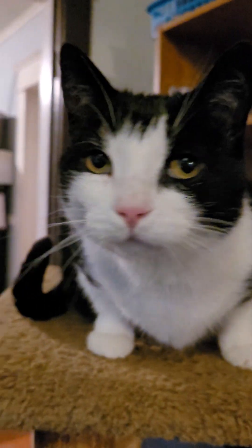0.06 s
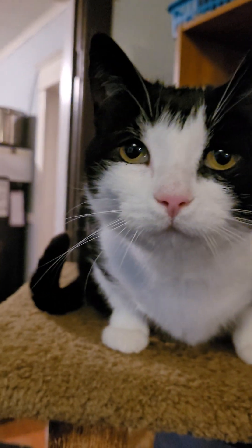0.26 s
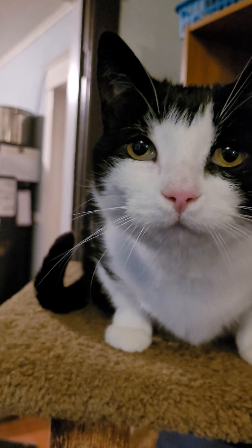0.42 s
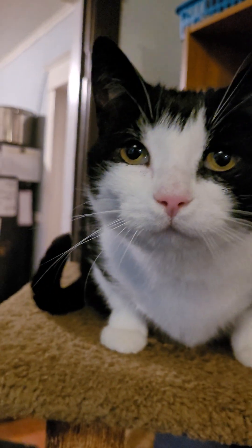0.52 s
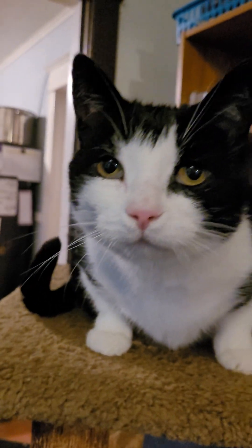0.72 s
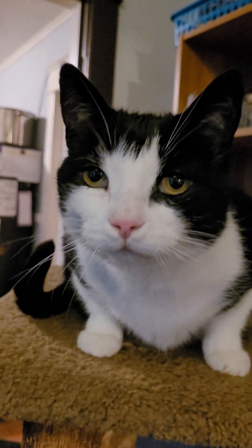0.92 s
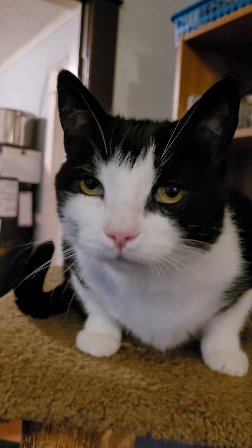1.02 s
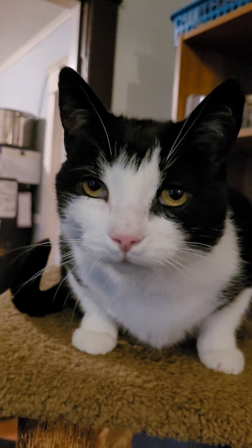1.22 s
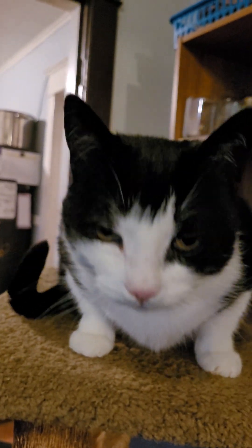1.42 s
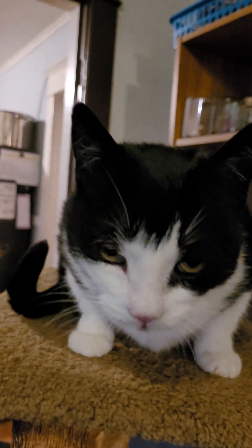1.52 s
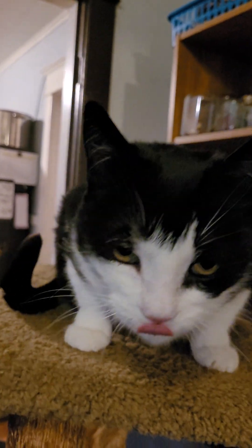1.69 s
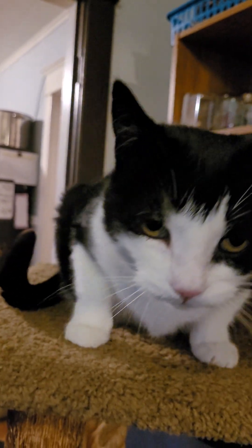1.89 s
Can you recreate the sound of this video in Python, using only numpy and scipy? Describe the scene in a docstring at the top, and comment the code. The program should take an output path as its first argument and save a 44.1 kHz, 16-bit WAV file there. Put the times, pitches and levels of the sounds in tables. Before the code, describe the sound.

A cat purrs loudly up close in one rattling bout, then smacks and licks its mouth.

```python
"""A cat purrs close by in a small, quiet room; noise and a faint mains hum lie below throughout.
First a faint, rough flutter dies away. Then the loud bout swells, holds and stops: about 30 times a second
the larynx twitches, the vocal folds flap a few times, air hisses through the nose, and a soft thump sounds
with each opening. After it the mouth opens with smacks (noise bursts rung by the mouth), the tongue licks
with wet ticks, and the faint flutter, noise with a pulsing level, returns."""
import sys
import numpy as np
from scipy import signal
from scipy.fft import rfft, irfft
from scipy.io import wavfile

SR = 44100
rng = np.random.default_rng(int(sys.argv[2]) if len(sys.argv) > 2 else 0)


def dump(signal):
    """Clip the signal to [-1, 1] and save it as 16-bit WAV at the path in sys.argv[1]."""
    limited = np.clip(np.atleast_2d(signal).T, -1, 1)
    pcm = np.round(limited * 32767).astype(np.int16)
    wavfile.write(sys.argv[1], SR, pcm)


N = 85995


def amp(db):
    """Decibels to gain."""
    return 10 ** (np.asarray(db) / 20)


def read(points, hz):
    """Interpolates a spectrum on a log-frequency axis."""
    f, value = np.transpose(points)
    return np.interp(np.log(hz + 1), np.log(f + 1), value)


def along(table, s):
    """Interpolates every column of a table at time s."""
    times, *columns = np.transpose(table)
    return [np.interp(s, times, column) for column in columns]


def add(mix, s, sound):
    """Adds a sound into mix at time s, cut at the end."""
    start = max(round(s * SR), 0)
    part = mix[..., start:][..., :sound.shape[-1]]
    part += sound[..., :part.shape[-1]]


def colour(x, points, unit_power=True, size=8192):
    """Minimum-phase filter with the given spectrum; unit_power keeps the power of white noise."""
    hz = abs(np.fft.fftfreq(size, 1 / SR))
    log_gain = np.log(amp(read(points, hz)))
    response = np.exp(np.conj(signal.hilbert(log_gain)))
    ring = np.fft.ifft(response).real[:size // 2]
    if unit_power:
        ring = ring / np.linalg.norm(ring)
    return signal.oaconvolve(np.atleast_2d(x), ring[None], axes=1)[:, :N]


def place(x, balance):
    """Pans each frequency by its left-minus-right level."""
    half_db = read(balance, np.fft.rfftfreq(N, 1 / SR)) / 2
    return irfft(rfft(x) * amp([half_db, -half_db]), N)


def noise_pair(shared):
    """Left and right white noise with a share of the power in common."""
    common, *sides = rng.standard_normal((3, N))
    shared = np.clip(shared, 0, 1)
    return np.sqrt(shared) * common + np.sqrt(1 - shared) * np.array(sides)


# Reverberation time. Each row: frequency in Hz, time to fall 60 dB in s.
ROOM_T60 = [(150, 0.6), (400, 0.17), (1500, 0.27), (5000, 0.18), (14000, 0.1)]


def room(x, wet_db):
    """Adds a diffuse tail: noise in which each band dies at its own speed."""
    hz, t, z = signal.stft(noise_pair(.5)[:, :SR // 2], SR, nperseg=256)
    decay = amp(-60 * t / read(ROOM_T60, hz)[:, None])
    after_direct = t > .004
    tail = signal.istft(z * decay * after_direct, SR, nperseg=256)[1]
    tail = tail / np.linalg.norm(tail[0])
    return x + amp(wet_db) * signal.fftconvolve(x, tail, axes=1)[:, :N]


# Spectrum of the room noise. Each row: frequency in Hz, relative level in dB.
FLOOR_COLOUR = [(25, -13), (130, -6.5), (200, -10.5), (270, 5), (330, -5.5), (400, -1), (600, -16.5),
                (1100, -13), (1800, -26.5), (2900, -23), (5000, -27.5), (9000, -32), (15500, -33.5)]
FLOOR_DB, FLOOR_SHARED = -65.5, 0.4
HUM_HZ, HUM_DB = 58.7, -73.5


def background():
    """Steady coloured room noise plus a sine of mains hum."""
    t = np.arange(N) / SR
    hum = amp(HUM_DB) * np.sqrt(2) * np.sin(2 * np.pi * HUM_HZ * t)
    return amp(FLOOR_DB) * colour(noise_pair(FLOOR_SHARED), FLOOR_COLOUR) + hum


# Level of the faint purr. Each row: time in s, level before the flutter in dB.
FAINT_LEVEL = [(0, -64), (.1, -86), (.14, -88), (1.72, -87.5), (1.8, -68), (1.85, -61.5), (1.95, -62.5)]
# Its spectrum. Each row: frequency in Hz, relative level in dB.
FAINT_COLOUR = [(60, -24), (130, -2.5), (200, -16.5), (270, 9), (330, -6.5), (420, -6), (600, -25.5),
                (1100, -25), (1600, -33.5), (4000, -43)]
FLUTTER_HZ, FLUTTER_DEPTH = 27, .45


def faint_purr():
    """The weak half of the purr: centred noise, its level pulsing, before and after the loud bout."""
    t = np.arange(N) / SR
    flutter = 1 + FLUTTER_DEPTH * np.cos(2 * np.pi * FLUTTER_HZ * t)
    level = amp(along(FAINT_LEVEL, t)[0])
    return colour(noise_pair(1.0) * flutter * level, FAINT_COLOUR)


# Smacks of the opening mouth. Each row: start in s, level in dB, decay constant in s.
SMACKS = [(1.549, -55.5, 0.0018), (1.5535, -57, 0.0077), (1.5745, -51.5, 0.0072)]
# Mouth resonances. Each row: frequency in Hz, relative level in dB.
MOUTH_COLOUR = [(600, -30), (1000, 1), (1300, -26), (1540, 11.5), (1850, -29), (2290, 9), (2650, -5.5),
                (3080, -2.5), (3500, -13.5), (4600, -3), (5600, -9.5), (7000, -11), (9000, -28),
                (15000, -18)]
# Wet ticks of the tongue. Each row: start in s, level in dB, decay constant in s.
LICKS = [(1.710, -73, 0.0041), (1.731, -62, 0.0078), (1.7655, -56.5, 0.0054), (1.793, -73.5, 0.039)]
# Resonances of the licks. Each row: frequency in Hz, relative level in dB.
TONGUE_COLOUR = [(1000, -8), (3300, -33), (4000, -3), (4700, -21), (5550, 7.5), (6100, -9), (7400, -5.5),
                 (9000, -43), (15000, -39)]
MOUTH_ROOM_DB = -6


def wet_ticks(events, cavity):
    """Saliva crackles: decaying noise bursts ring the cavity and the room."""
    level, t = np.zeros(N), np.arange(SR // 10) / SR
    for s, db, decay_s in events:
        add(level, s, amp(db) * np.exp(-t / decay_s))
    return room(colour(level * noise_pair(0.54), cavity), MOUTH_ROOM_DB)


# Tones of the folds. Each row: multiple of the pitch, level at mid-twitch in dB,
# swell over the twitch in dB, glide over the twitch as a share of frequency.
TONES = [(.98, -3, 5, 0.11), (1.93, -17, -2.5, -0.096), (2.95, -30.5, 6.5, 0.19)]
ATTACK_S, RELEASE_S, OVERHANG_S, FIRST_FLAP_S = 0.0035, 0.0061, 0.0028, 0.00234
FULL_DB, FULL_PITCH_HZ = -20.5, 347.3  # reference twitch
FOLDS_DB, BRIGHTEN_PER_DB = -0.5, 0.0744  # softer than reference: duller
SHUT_HZ, SHUT_DB, SHUT_S, SHUT_LEAD_S = 760, -11, 0.0016, 0.002314  # at reference
HISS_DB, HISS_GROWTH_DB_PER_DB, HISS_PULSING, HISS_RELEASE_S = -26, 1.4, 0.26, 0.0067
SNAP_DB, SNAP_S = 6.5, 0.00025  # relative to the hiss, at reference


def twitch(length_s, level_db, pitch_hz):
    """One opening of the larynx: flaps of the folds, a throat ring as it shuts, pulsing air."""
    t = np.arange(SR // 30) / SR
    progress = np.minimum(t / length_s - .5, 1)
    left_s = length_s + OVERHANG_S - t
    opening = np.sin(np.pi / 2 * np.clip(t / ATTACK_S, 0, 1))
    closing = np.sin(np.pi / 2 * np.clip(left_s / RELEASE_S, 0, 1)) ** 2
    gate = opening * closing
    over_db = level_db - FULL_DB
    dull = np.exp(BRIGHTEN_PER_DB * min(over_db, 0))

    flaps = 0
    for k, (multiple, db, swell_db, glide) in enumerate(TONES):
        tone_hz = pitch_hz * multiple * (1 + glide * progress)
        turns = np.cumsum(tone_hz) / SR - (k + 1) * pitch_hz * FIRST_FLAP_S
        flaps = flaps + dull ** k * amp(db + swell_db * progress) * np.cos(2 * np.pi * turns)

    after_s = np.maximum(t - length_s + SHUT_LEAD_S, 0)
    shut_hz = SHUT_HZ * pitch_hz / FULL_PITCH_HZ
    shut_envelope = after_s / SHUT_S * np.exp(1 - after_s / SHUT_S)
    shut = dull ** 2 * amp(SHUT_DB) * np.sin(2 * np.pi * shut_hz * after_s) * shut_envelope

    pulsing = 1 + HISS_PULSING * np.cos(2 * np.pi * pitch_hz * t)
    flow = opening * np.clip(left_s / HISS_RELEASE_S, 0, 1) ** 2 * pulsing
    snap = amp(SNAP_DB + over_db / 2) * np.exp(-t / SNAP_S)
    air = flow * amp(HISS_GROWTH_DB_PER_DB * over_db) + snap

    voiced = amp(level_db + FOLDS_DB) * (np.sqrt(2) * gate * flaps + shut)
    return voiced, amp(FULL_DB + HISS_DB) * air, gate


# Course of the bout. Each row: time in s, twitches per s, twitch length in s, level in dB, fold pitch in Hz.
PURR = [(0.115, 33.33, 0.0058, -44.2, 353.0), (0.145, 33.81, 0.0057, -32, 349.0),
        (0.205, 31.97, 0.0125, -28.9, 295.0), (0.269, 28.82, 0.0129, -25.4, 313.0),
        (0.304, 33.7, 0.0105, -25.5, 328.0), (0.365, 29.87, 0.0145, -22.9, 313.0),
        (0.565, 30.97, 0.0132, -21.0, 337.0), (0.627, 30.09, 0.0168, -19.2, 331.0),
        (0.695, 29.02, 0.0142, -20.2, 345.0), (0.73, 33.22, 0.0118, -21.4, 351.0),
        (0.76, 29.77, 0.0148, -19.5, 343.0), (1.164, 29.63, 0.0144, -19.0, 342.0),
        (1.197, 27.03, 0.0167, -19.1, 339.0), (1.27, 30.25, 0.0132, -19.9, 345.0),
        (1.337, 27.48, 0.0153, -18.8, 333.0), (1.409, 27.98, 0.0099, -24.2, 331.0),
        (1.446, 31.94, 0.0069, -25.7, 331.0), (1.476, 31.94, 0.0098, -29, 296)]
PURR_END_S = 1.49
PITCH_JITTER, WOBBLE_DB, LATE_S = 0.005, 0.3, 0.00052  # standard deviations; jitter as a share


def twitches():
    """Lays twitch after twitch with small random changes; returns voice, air flow and gates."""
    folds, air, gates = np.zeros((3, N))
    s = PURR[0][0]
    for level_draw, pitch_draw, late_draw in rng.standard_normal((60, 3)):
        if s > PURR_END_S:
            break
        rate_hz, length_s, level_db, pitch_hz = along(PURR, s)
        late_s = LATE_S * late_draw  # a late twitch is a shorter one
        level_db = level_db + WOBBLE_DB * level_draw
        pitch_hz = pitch_hz * (1 + PITCH_JITTER * pitch_draw)
        flaps, flow, gate = twitch(length_s - late_s, level_db, pitch_hz)
        add(folds, s + late_s, flaps)
        add(air, s + late_s, flow)
        add(gates, s + late_s, gate)
        s += 1 / rate_hz
    return folds, air, gates


# Spectrum of the puffs. Each row: frequency in Hz, relative level in dB.
PUFF_COLOUR = [(30, -24), (90, -14.5), (140, -0.5), (230, -12), (500, -19), (2000, -62.5)]
PUFF_DB = -50


def air_puffs(gates):
    """Low noise of the air let through while the larynx is open."""
    return amp(PUFF_DB) * colour(gates * noise_pair(0.95), PUFF_COLOUR)


# Spectrum of the nose air. Each row: frequency in Hz, relative level in dB.
HISS_COLOUR = [(200, -4), (950, 13.5), (1300, 10.5), (1500, -7), (1850, -10), (2020, -6.5), (2400, -17),
               (3500, -22), (4700, -18.5), (5170, -5), (5600, -9.5), (7300, -3.5), (8400, -5.5),
               (9300, -17.5), (10300, -21.5), (11400, -12.5), (12100, -6), (13200, -18), (15500, -22)]
# Extra tint of the early hiss. Each row: frequency in Hz, gain in dB.
EARLY_TINT = [(1300, 1.5), (1900, -8.5), (5000, -5.5), (5700, 7.5), (7000, 2), (12000, -8.5), (13500, 2)]
# Fade of that tint. Each row: time in s, tinted share.
EARLY_SHARE = [(.5, 0.87), (.8, 0.0059)]
# Stereo of the hiss. Each row: frequency in Hz, left minus right in dB.
HISS_BALANCE = [(2000, 3), (4000, -4), (5200, -2.5), (5700, -1.5), (7200, -10), (8400, 5.5), (10000, 3.5),
                (12000, -1)]
HISS_ROOM_DB = -10.5


def nose_hiss(air):
    """Turbulent noise follows the air flow through the nose; its tint changes as the bout goes on."""
    hiss = colour(air * noise_pair(0.043), HISS_COLOUR)
    early = along(EARLY_SHARE, np.arange(N) / SR)[0]
    hiss = colour(early * hiss, EARLY_TINT, False) + (1 - early) * hiss
    return room(place(hiss, HISS_BALANCE), HISS_ROOM_DB)


# Throat and nose. Each row: frequency in Hz, gain in dB.
THROAT = [(30, -11), (140, -17.5), (240, -1.5), (330, 0.5), (640, 2.5)]
# Thump drive. Each row: time in s, level before doubling and filter in dB.
THUMP_LEVEL = [(.11, -69), (.2, -59), (.3, -58.5), (.45, -41.5), (.6, -53.5), (.7, -63.5), (1.0, -63),
               (1.3, -56.5), (1.49, -59.5)]
# Thump filter. Each row: frequency in Hz, gain in dB.
THUMP_COLOUR = [(32, -25), (58, 2), (85, -6), (130, -2.5), (200, -12.5), (400, -43.5)]
# Nearby surfaces. Each row: delay in s, gain as a signed factor.
ECHOES = [(.008, -.107), (.0155, .087)]
# Stereo of the voice. Each row: frequency in Hz, left minus right in dB.
PURR_BALANCE = [(60, 2), (330, -1.96), (450, -7), (740, -2), (900, -6.5), (1120, 8.5), (1400, 7),
                (2000, -4)]
PURR_ROOM_DB = -20.5


def purr_voice(folds, gates):
    """Flaps sound through the throat, each opening thumps, nearby surfaces echo both."""
    thumps = 2 * gates * amp(along(THUMP_LEVEL, np.arange(N) / SR)[0])
    voice = colour(folds, THROAT, False) + colour(thumps, THUMP_COLOUR, False)
    hz = np.fft.rfftfreq(N, 1 / SR)
    echoes = sum(gain * np.exp(-2j * np.pi * hz * delay_s) for delay_s, gain in ECHOES)
    voice = irfft(rfft(voice) * (1 + echoes), N)
    return room(place(voice, PURR_BALANCE), PURR_ROOM_DB)


def purr():
    """The loud bout: the same twitches drive puffs, hiss and voice."""
    folds, air, gates = twitches()
    return air_puffs(gates) + nose_hiss(air) + purr_voice(folds, gates)


def scene():
    """The cat in its room."""
    mouth = wet_ticks(SMACKS, MOUTH_COLOUR) + wet_ticks(LICKS, TONGUE_COLOUR)
    return background() + faint_purr() + mouth + purr()


def record(dry):
    """Band limit: a linear-phase low-pass at 15750 Hz."""
    lowpass = signal.firwin(511, 15750, window=("kaiser", 9), fs=SR)
    return signal.oaconvolve(dry, lowpass[None], "same")


dry = scene()
out = record(dry)
dump(out)
```